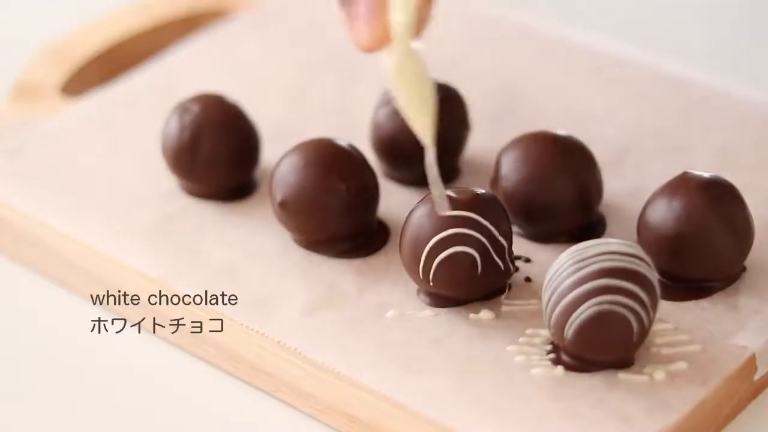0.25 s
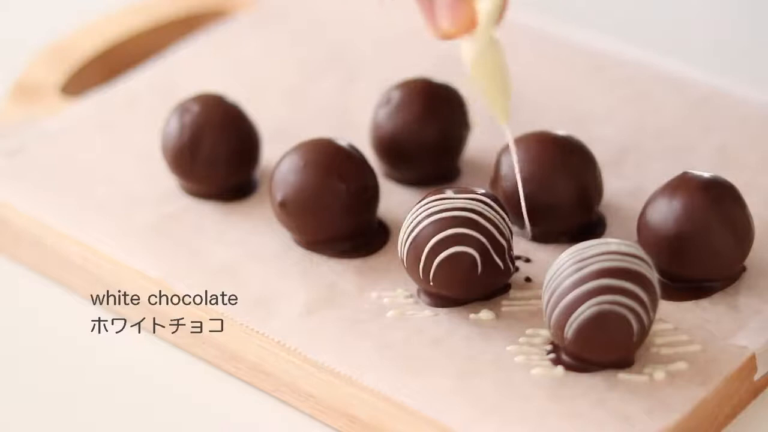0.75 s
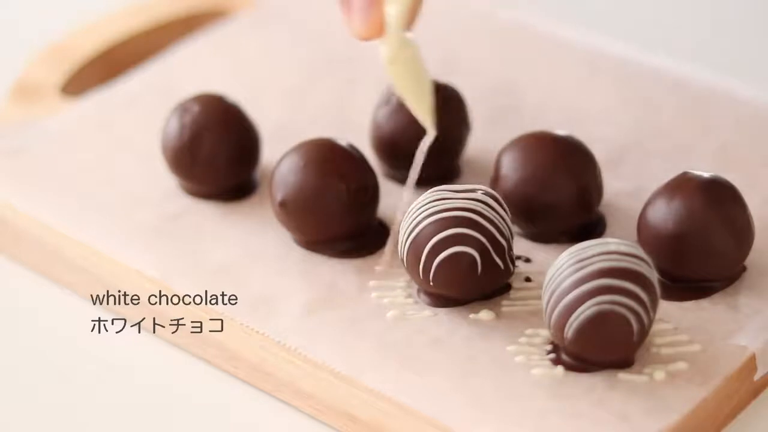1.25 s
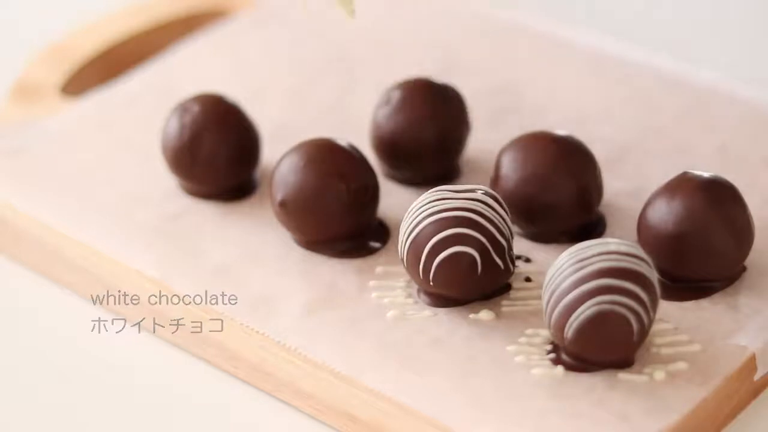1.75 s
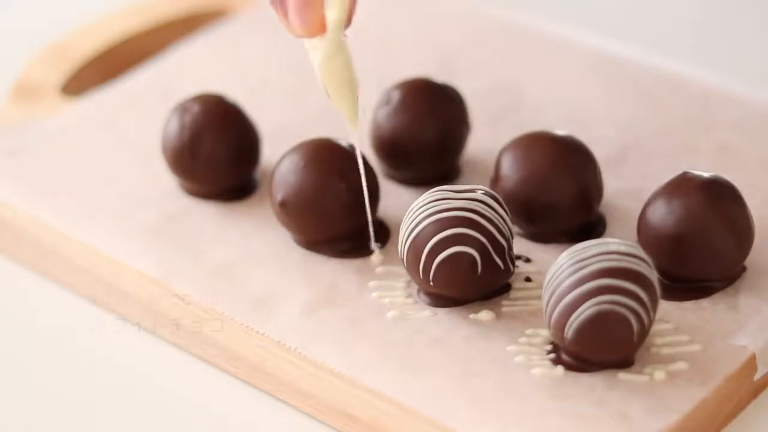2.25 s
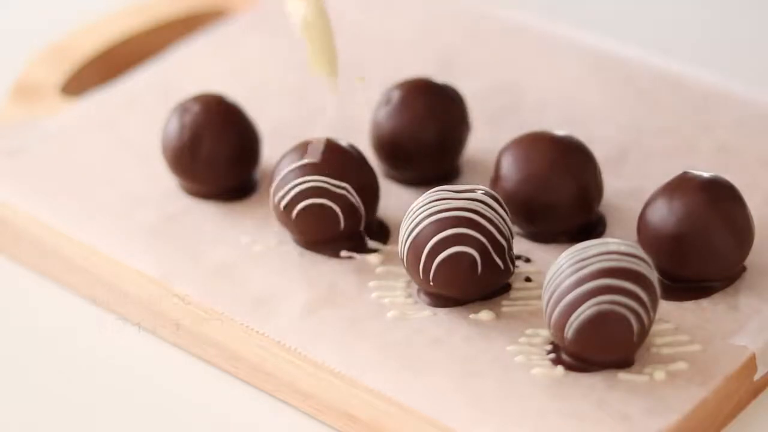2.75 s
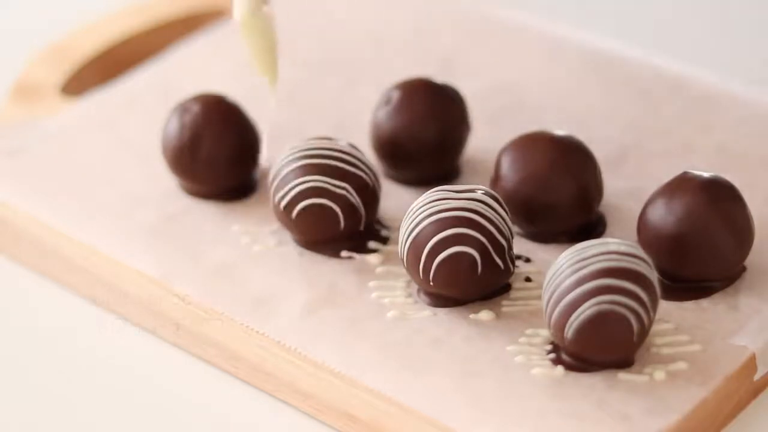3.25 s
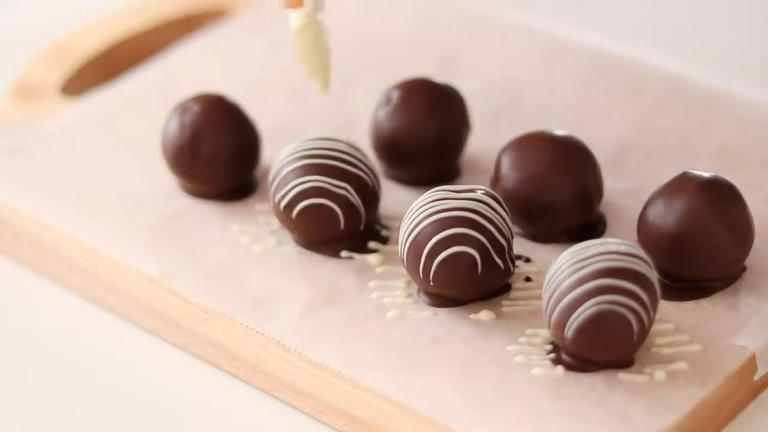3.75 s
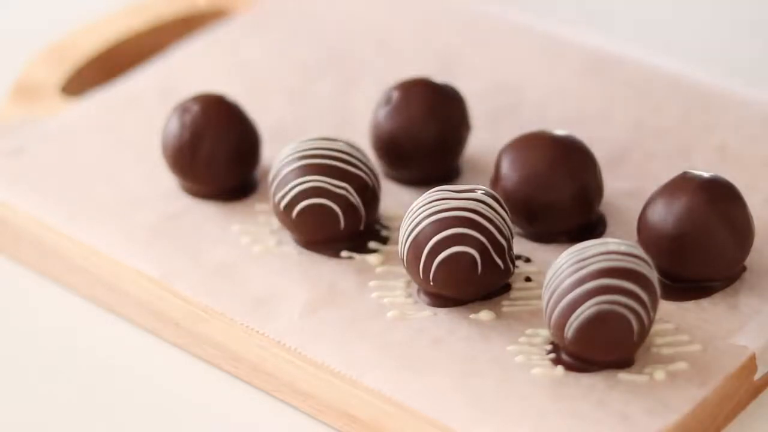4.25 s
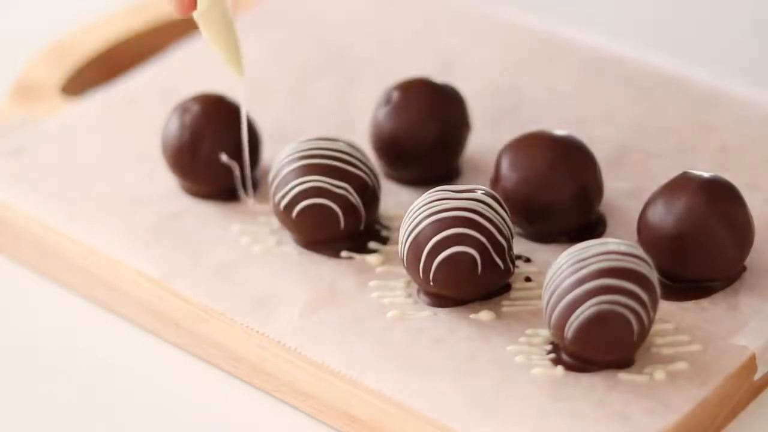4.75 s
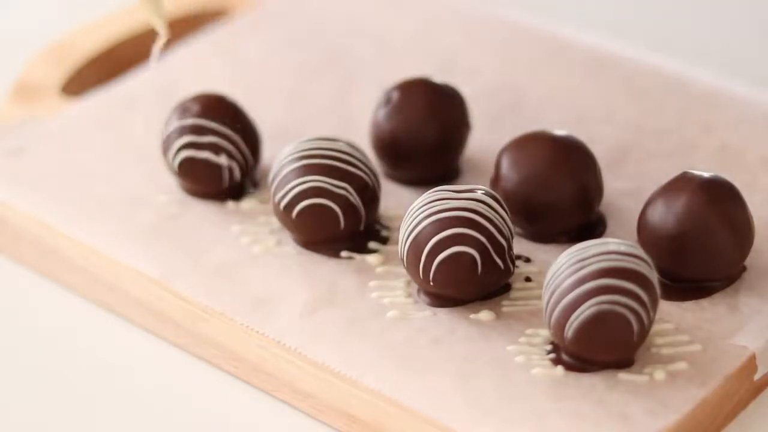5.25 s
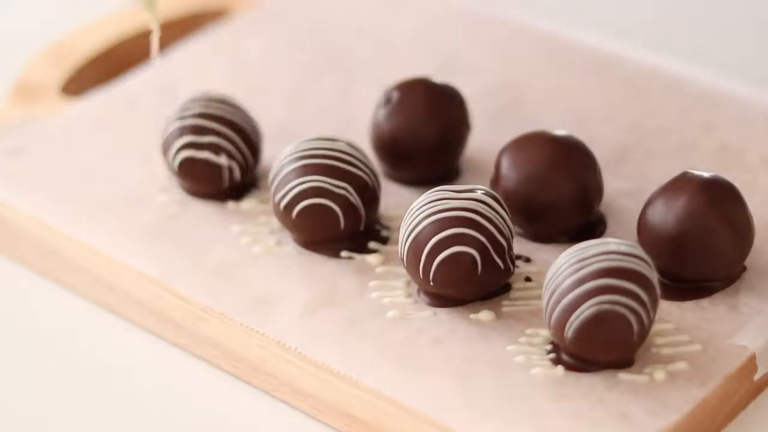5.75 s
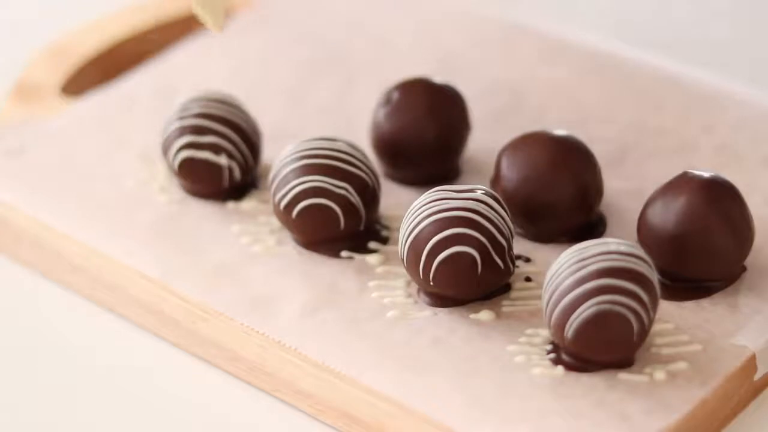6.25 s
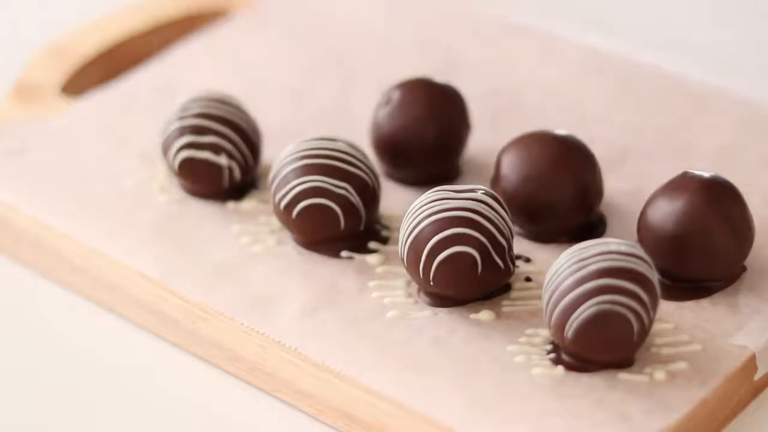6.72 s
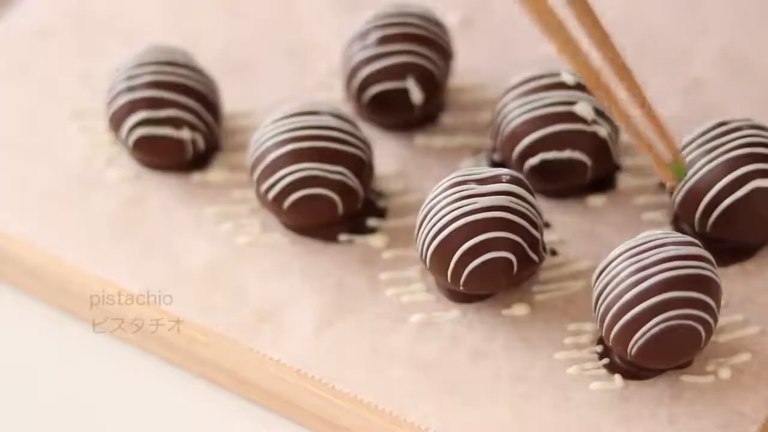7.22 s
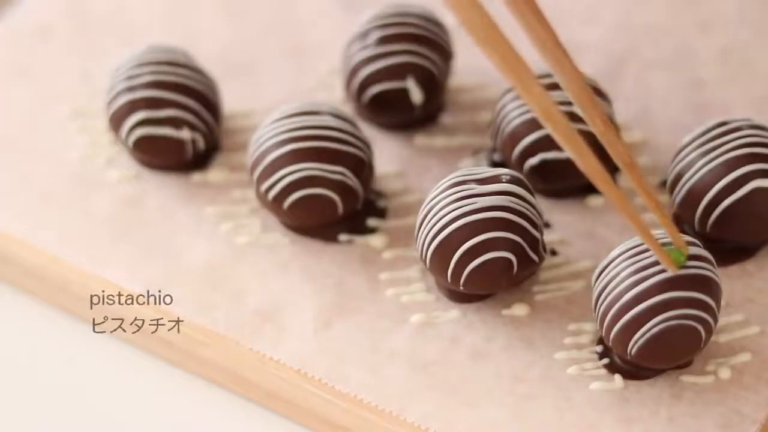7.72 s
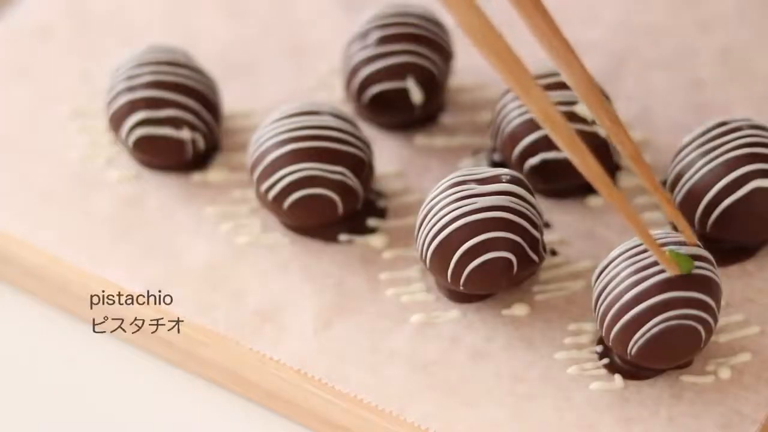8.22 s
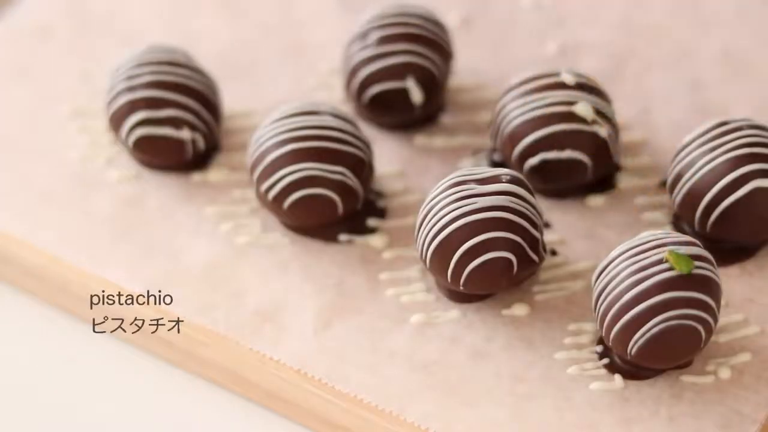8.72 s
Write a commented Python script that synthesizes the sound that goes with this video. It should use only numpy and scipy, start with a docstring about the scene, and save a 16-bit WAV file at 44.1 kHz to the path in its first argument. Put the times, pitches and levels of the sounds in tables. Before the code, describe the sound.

Sparse, bright plastic film clicks gather into three short crinkly bursts over steady room murmur, with dull worktop thumps and one tiny wooden tick near the end.

```python
"""A small plastic piping bag is squeezed close to the microphones in a quiet kitchen, over steady room noise.
Lone film snaps, each a struck set of resonances, gather into three fuller crinkles near 1.6, 4.1 and 6.5 s;
dense random creases thicken these, finger slips creak from 3.9 s, and a diffuse tail answers the bag.
From 2.5 s the moving arm rumbles as slowly fading resonant noise; from 6 s shaped noise swishes faintly.
The level dips briefly near 7 s, and at 8.07 s chopsticks tick once as three short resonances."""
import sys
import numpy as np
from scipy import signal
from scipy.fft import rfft, irfft, next_fast_len
from scipy.io import wavfile

SR = 44100
rng = np.random.default_rng(int(sys.argv[2]) if len(sys.argv) > 2 else 0)


def materialize(psi):
    """Save the field psi as 16-bit PCM at rate SR to the path in sys.argv[1].

    A 1-D psi becomes a single channel; in a 2-D psi each row is a channel.
    """
    bounded = np.clip(np.atleast_2d(psi).T, -1, 1)
    quanta = np.round(bounded * 32767).astype(np.int16)
    wavfile.write(sys.argv[1], SR, quanta)


N = 396018
TIME = np.arange(N) / SR  # s

# the whole pouch's resonance, shaken by every snap and finger slip: pitch_hz, half_width_hz
POUCH_RESONANCE = (2320, 210)


def undb(db):
    """Turn decibels into gain."""
    return 10 ** (np.asarray(db) / 20)


def unit(x):
    """Scale to rms 1."""
    return x / np.sqrt(np.mean(x ** 2) + 1e-30)


def shape(x, gain):
    """Filter by a gain that is a function of frequency, without shifting the sound in time."""
    length = x.shape[-1]
    n = next_fast_len(length)
    spectrum = rfft(x, n) * gain(np.fft.rfftfreq(n, 1 / SR))
    return irfft(spectrum, n)[..., :length]


def ring(x, hz, half_hz):
    """A bell-shaped resonance: the motion builds up and dies again within a few cycles."""
    return shape(x, lambda f: np.exp(-((f - hz) / (2 * half_hz)) ** 2))


def colour(x, points):
    """Equalise a sound through (Hz, dB) points, joined on a logarithmic frequency scale."""
    hz, db = np.transpose(points)
    return shape(x, lambda f: undb(np.interp(np.log(f + 1), np.log(hz), db)))


def add(track, s, sound):
    """Mix a sound into a track at time s."""
    i = int(np.clip(s * SR, 0, N - len(sound)))
    track[i:i + len(sound)] += sound


def swells(rows):
    """One rounded rise and fall for each (start_s, end_s, level_db) row."""
    envelope = np.zeros(N)
    for start_s, end_s, level_db in rows:
        progress = np.interp(TIME, [start_s, end_s], [0, 1])
        envelope += undb(level_db) * np.sqrt(np.abs(np.sin(np.pi * progress)))
    return envelope


def spread(mid, side, side_db, left_db):
    """Two channels from a shared and an opposed part; left_db is the left gain relative to the right."""
    side = undb(side_db) * side
    return np.array([mid + side, mid - side]) * undb([[left_db / 2], [-left_db / 2]])


def air():
    """Low room murmur, partly shared by both sides, under smooth unrelated hiss."""
    # colour of the steady room noise: pitch_hz, level_db (per Hz, relative)
    room_noise = [(22, -10.5), (32, -13.5), (45, -8), (70, 0), (105, -3.5), (145, -2), (220, -6.5),
                  (420, -12), (850, -16.5), (1800, -23), (3500, -25.5), (10000, -28.5), (15600, -29),
                  (16300, -50)]
    mid, side = unit(colour(rng.standard_normal((2, N)), room_noise))
    side = colour(side, [(60, 0.5), (200, -2.0), (1200, -1.5), (3000, 0)])
    return undb(-61.5) * spread(mid, side, side_db=-0.5, left_db=-0.48)


def kitchen(x, t60_s=0.34, wet_db=-12, early_db=2, early_s=0.0159, gap_s=0.0098):
    """Worktop and cupboards answer within milliseconds, then a short diffuse tail dies away."""
    # the film throws its lower notes sideways, so the walls get more of them: pitch_hz, level_db
    wall_colour = [(500, -2), (1800, 0), (2350, 8.5), (3000, 10), (4200, 3.5), (6200, 4.5), (8500, 0),
                   (11000, -2.5), (13000, 0.5), (16000, 2)]
    t = np.arange(SR // 2) / SR
    decay = undb(-60 * t / t60_s)
    early_boost = 1 + undb(early_db) * np.exp(-t / early_s)
    onset = np.clip(t / gap_s, 0, 1) ** 2
    fade = decay * early_boost * onset
    tail = rng.standard_normal((2, len(t))) * fade / np.sqrt(np.sum(fade ** 2))
    return undb(wet_db) * signal.fftconvolve(colour(x, wall_colour)[None], tail, axes=1)[:, :N]


def arm(rise_db_per_s=320, fade_db_per_s=70):
    """Dragging contact shakes the worktop's low resonances, building quickly, easing slowly, more on the right."""
    # shifts of the arm on the worktop: strongest_push_s, level_db
    shifts = [(2.475, -57), (2.579, -58.5), (2.78, -62.5), (4.615, -58.5), (4.72, -47.5), (6.462, -44),
              (6.705, -46.5)]
    # low resonances of the worktop: pitch_hz, half_width_hz, level_db
    worktop = [(52, 16, -7.5), (88, 7.4, 5.5), (148.5, 12.6, -0.5), (198, 49, -10.5)]
    pushes_db = []
    for s, db in shifts:
        drop_db = np.maximum(rise_db_per_s * (s - TIME), fade_db_per_s * (TIME - s))
        pushes_db.append(db - drop_db)
    effort = undb(np.max(pushes_db, axis=0))
    drag = rng.standard_normal((2, N))
    mid, side = unit(sum(undb(db) * ring(drag, hz, half_hz) for hz, half_hz, db in worktop))
    return effort * spread(mid, side, side_db=-3, left_db=-5)


def sleeve():
    """Soft brushing, as of cloth while the hand draws back: shaped noise in slow swells."""
    # the brushing strokes: start_s, end_s, level_db
    swishes = [(5.98, 6.14, -68), (6.74, 7.0, -60.5)]
    # colour of the brushing: pitch_hz, level_db
    cloth_colour = [(300, -3.5), (700, -7), (1150, 0), (1500, -10), (2000, -2.5), (2700, -12.5),
                    (6000, -23), (15000, -20)]
    mid, side = unit(colour(rng.standard_normal((2, N)), cloth_colour))
    return swells(swishes) * spread(mid, side, side_db=-7, left_db=2.5)


def chopsticks(tick_s=8.0687, strength_db=-26, size=512):
    """The wooden tips meet once, very lightly, and one impulse rings their resonances."""
    # resonances of the sticks: pitch_hz, half_width_hz, level_db
    wood = [(2320, 230, -5), (3840, 420, 1.5), (7960, 1500, -9)]
    out = np.zeros(N)
    push = 1. * (np.arange(size) == size // 2)
    tick = sum(undb(strength_db + db) * ring(push, hz, half_hz) for hz, half_hz, db in wood)
    add(out, tick_s - size / 2 / SR, tick)
    return out


def fingers(per_s=150):
    """Skin sticks and slips on the film; each slip shakes the whole pouch and makes it creak."""
    # finger slides on the pouch: start_s, end_s, level_db
    slides = [(3.92, 3.99, -67), (4.02, 4.16, -61), (4.42, 4.72, -78)]
    slips = rng.standard_normal(N) * (rng.random(N) < per_s / SR)
    return swells(slides) * unit(ring(slips, *POUCH_RESONANCE))


def creases(per_s, scatter_db):
    """Tiny creases of random size, shared among a few resonances of the film."""
    # resonances of the tiniest creases: pitch_hz, half_width_hz, level_db
    film = [(4300, 560, -9), (8450, 810, -1), (10000, 1200, 1.5), (11530, 1100, -6.5)]
    out = np.zeros(N)
    for hz, half_hz, db in film:
        size_db = scatter_db * np.clip(rng.standard_normal(N), -2, 2)
        size = undb(size_db) * rng.choice([-1, 1], N)
        gives_way = rng.random(N) < per_s / SR / len(film)
        out += undb(db) * ring(size * gives_way, hz, half_hz)
    return unit(out)


def crinkle():
    """Dense crackle as the grip tightens and many creases give way; stray faint ticks while the bag is held."""
    # squeezes of the bag: start_s, end_s, level_db
    squeezes = [(1.515, 1.56, -55), (1.545, 1.66, -37.5), (3.92, 4.0, -50), (4.013, 4.055, -37.5),
                (4.178, 4.245, -50), (4.69, 4.8, -64), (4.985, 5.065, -60), (6.345, 6.46, -57),
                (6.48, 6.6, -52)]
    held = swells([(0.0065, 7.5, -75.0)])
    crackle = swells(squeezes) * creases(per_s=1700, scatter_db=6.5)
    return crackle + held * creases(per_s=14, scatter_db=6)


def snaps(flutter=0.19, flutter_s=0.0012, lead_in=0.024, lead_in_s=0.0012, crack_db=-24, crack_share=0.19, size=512):
    """A crease flips over with a softened onset and flutters for a millisecond, ringing itself and its film."""
    # film buckles: flip_s, level_db (crease, over 1 ms), crease_hz, crease_half_width_hz,
    # panel_db (relative to the crease)
    buckles = [(0.1956, -25, 9430, 1120, -19.5), (1.0178, -52.5, 9400, 1600, -21),
               (1.4488, -54.5, 9400, 1800, -17), (1.5377, -48, 10000, 1200, -23),
               (1.5595, -25, 10700, 1890, -24), (1.5709, -37, 10000, 1990, -5),
               (1.581, -34, 9200, 2200, -16), (1.59, -38, 9100, 1500, -4), (1.6018, -23.5, 9200, 1300, -10),
               (1.607, -16.5, 8900, 1290, -14.5), (1.6267, -12.5, 10100, 1430, -19),
               (1.634, -27, 9500, 1310, 0.5), (1.7847, -35, 8600, 594, -5.5), (1.8934, -35, 9760, 600, -29),
               (2.0656, -31, 10000, 920, -25), (2.0913, -38.5, 10100, 897, -21),
               (2.7506, -26, 8900, 880, -23.5), (2.784, -38, 9700, 705, -26), (3.03, -52, 8700, 1400, -10),
               (3.239, -51, 9700, 1610, -21), (3.4192, -36, 9700, 1090, -18.5),
               (3.7019, -46, 10800, 1800, -13), (3.9264, -33, 9140, 700, -34),
               (3.9492, -34, 9700, 1000, -27), (4.0144, -29, 9600, 1200, -17), (4.04, -32, 9400, 1500, -16),
               (4.063, -34, 9700, 1300, -10), (4.0763, -28, 9300, 1400, -5.5),
               (4.0825, -13, 9180, 1410, -11), (4.1586, -34.5, 9400, 1200, -20),
               (4.1863, -36, 9700, 1200, -24), (4.2016, -31.5, 9700, 1190, -24),
               (4.2301, -28.5, 10400, 1100, -33), (4.3794, -38, 8060, 890, -23),
               (4.5016, -42, 9500, 1090, -16), (4.717, -28.5, 9800, 910, -11), (4.749, -33, 9700, 900, -14),
               (4.778, -33.5, 9800, 1000, -16), (4.8342, -28.5, 9800, 1180, -25),
               (4.8845, -20, 9670, 1300, -46), (4.9152, -30.5, 9800, 1380, -26),
               (4.9897, -26, 9800, 990, -30), (5.1044, -31, 9900, 900, -29), (6.366, -36, 9800, 994, -26),
               (6.3963, -32, 9300, 694, -28), (6.465, -38, 10800, 1500, -21), (6.492, -34, 9700, 1200, -30),
               (6.508, -29, 10000, 1200, -34), (6.5503, -23, 10400, 1460, -12),
               (6.5674, -28, 9300, 1490, -12), (6.571, -26.5, 8300, 1070, -7),
               (6.5782, -31, 9800, 1400, -19), (6.597, -23, 9300, 1060, -8),
               (6.7698, -21, 9700, 1260, -31.5), (6.8841, -28.5, 10000, 1200, -40)]
    # colour of a snap's sharp edge: pitch_hz, level_db
    edge_colour = [(300, -19), (900, -6), (1300, 3.5), (1700, -11.5), (3000, 9), (6000, -12.5),
                   (12000, 13.5), (16000, 8)]
    out = np.zeros(N)
    t = (np.arange(size) - size // 2) / SR
    one_ms = np.sqrt(SR / 1000 / size)  # turns rms over the whole window into level over 1 ms
    before = lead_in * np.exp(-np.abs(t) / lead_in_s)
    after = flutter * np.exp(-np.abs(t) / flutter_s)
    shake = np.where(t < 0, before, after)
    for s, db, hz, half_hz, panel_db in buckles:
        push = (t == 0) + shake * rng.standard_normal(size)
        crease = unit(ring(push, hz, half_hz))
        # the flat panel beside the crease sounds higher when it is smaller and quieter,
        # and higher again as a strong snap stretches the film
        panel_hz = 4105 - 7.5 * panel_db + 2023 * undb(db)
        # a narrower resonance than the crease lets the panel ring longer
        panel = undb(panel_db) * unit(ring(push, panel_hz, 0.4 * half_hz))
        # the panel passes the snap on: the pouch follows its level by 0.3 dB per dB
        pouch_db = -23.5 + 0.3 * panel_db
        pouch = undb(pouch_db) * unit(ring(push, *POUCH_RESONANCE))
        # the more of the panel flips with the crease, the harder the crack
        crack_gain = undb(crack_db) + crack_share * undb(panel_db)
        crack = crack_gain * unit(colour(push, edge_colour))
        add(out, s + t[0], undb(db) * one_ms * (crease + panel + pouch + crack))
    return out


def scene():
    """Bag and chopsticks sit centred and close; the room surrounds them and the whole level dips briefly."""
    close = snaps() + crinkle() + fingers() + chopsticks()
    # the left microphone points slightly away and loses the very top
    left = colour(close, [(10000, -0.5), (13000, -6.5), (16000, -9.0)])
    direct = np.array([left, close])
    dip_s, dip_half_length_s, dip_db = 6.988, .008, -17
    dip = undb(dip_db * np.exp(-((TIME - dip_s) / dip_half_length_s) ** 2))
    return (direct + kitchen(close) + arm() + sleeve() + air()) * dip


def record(dry):
    """The recorder cuts the top with a steep low-pass at 16.2 kHz."""
    top_cut = signal.ellip(10, .1, 70, 16200, fs=SR, output="sos")
    return signal.sosfilt(top_cut, dry)


dry = scene()
out = record(dry)
materialize(out)
```